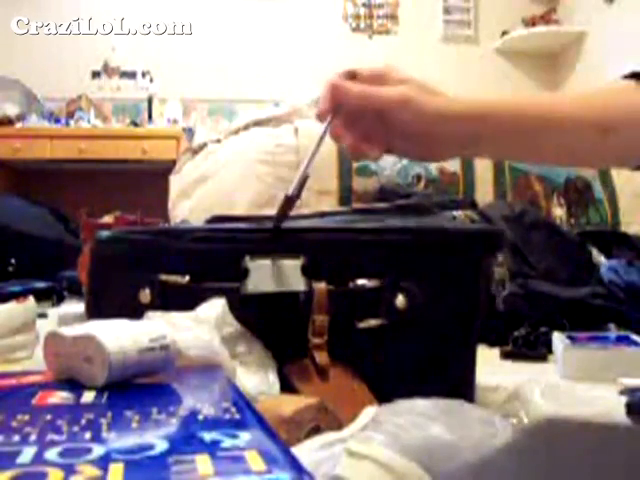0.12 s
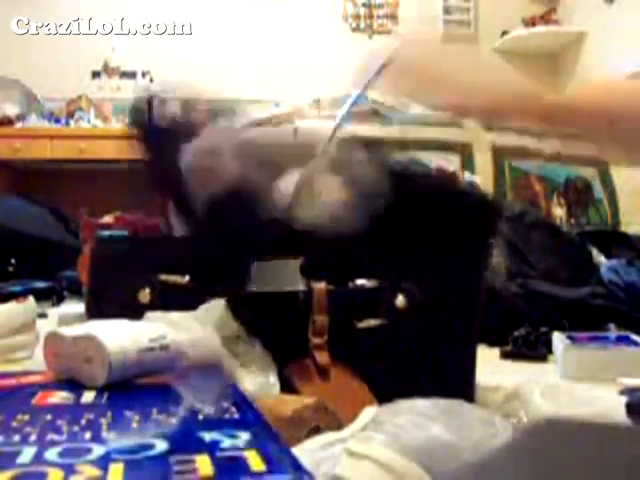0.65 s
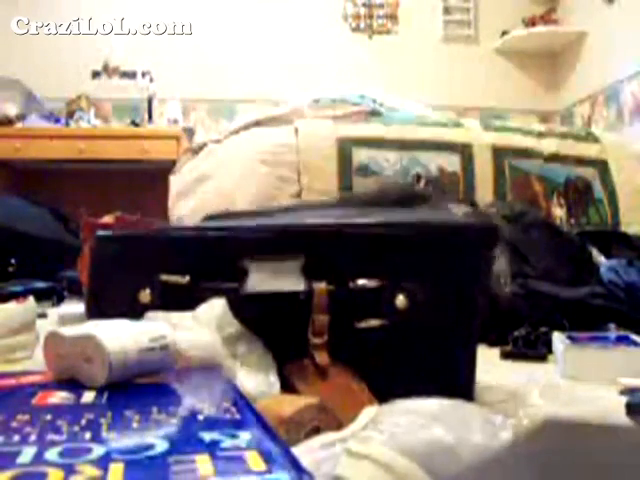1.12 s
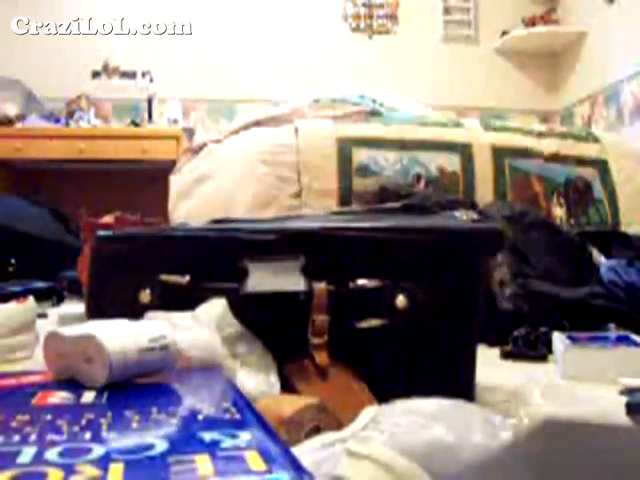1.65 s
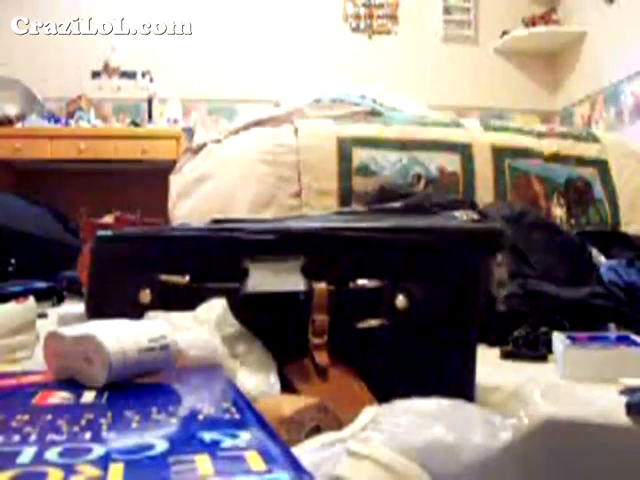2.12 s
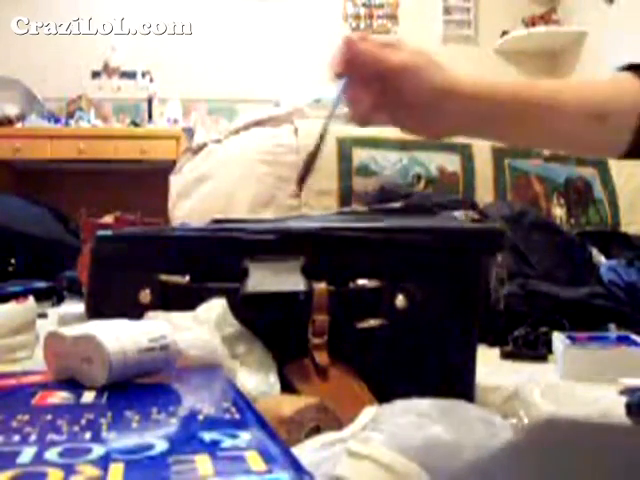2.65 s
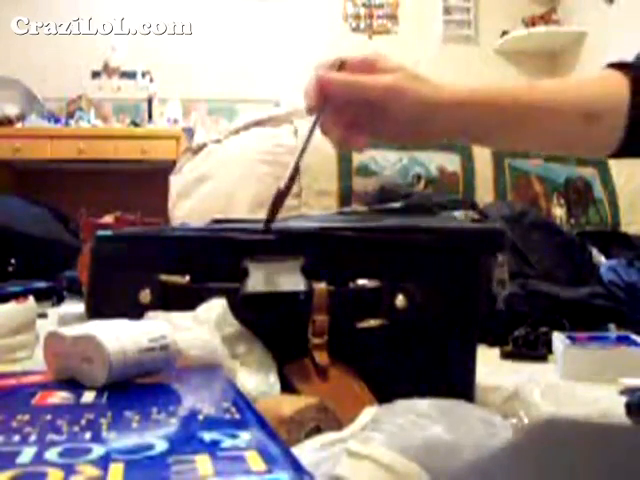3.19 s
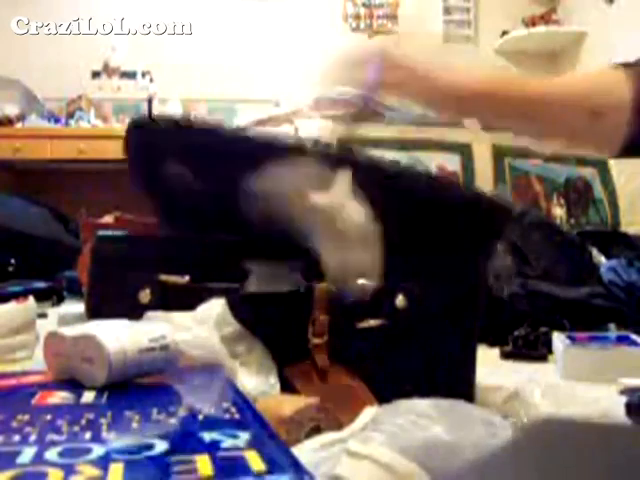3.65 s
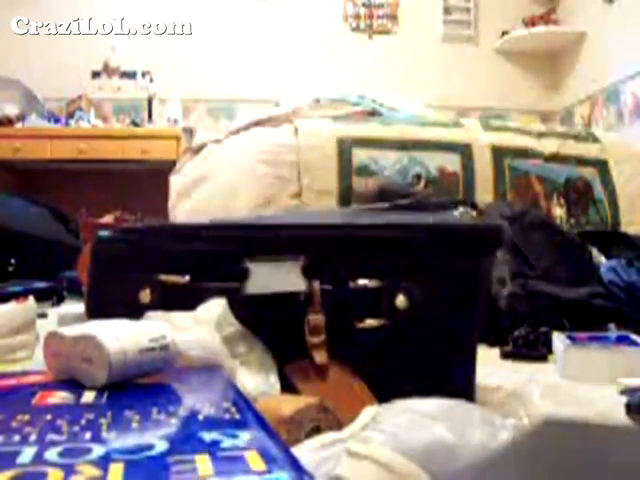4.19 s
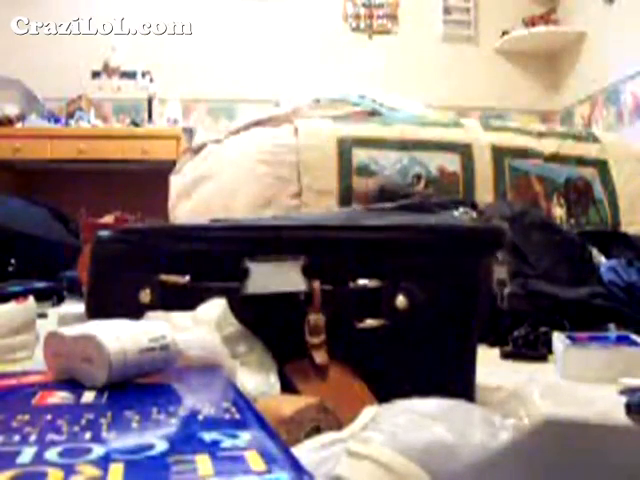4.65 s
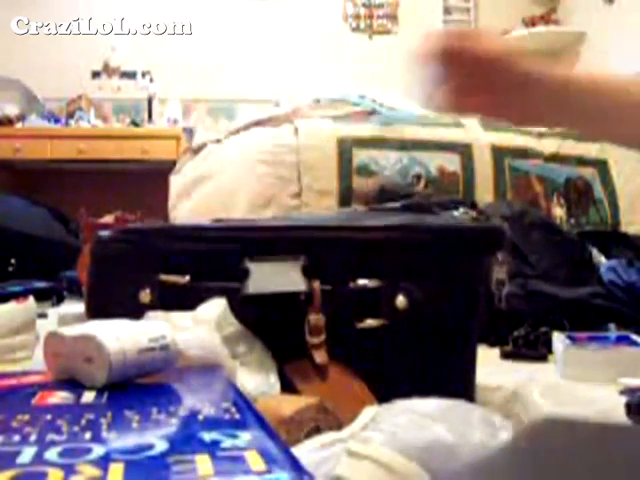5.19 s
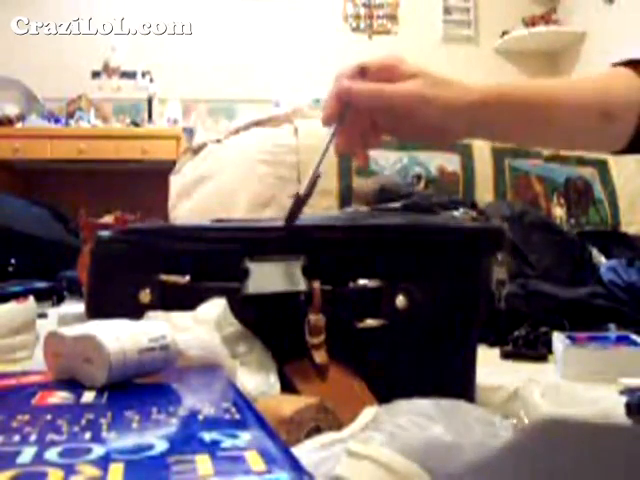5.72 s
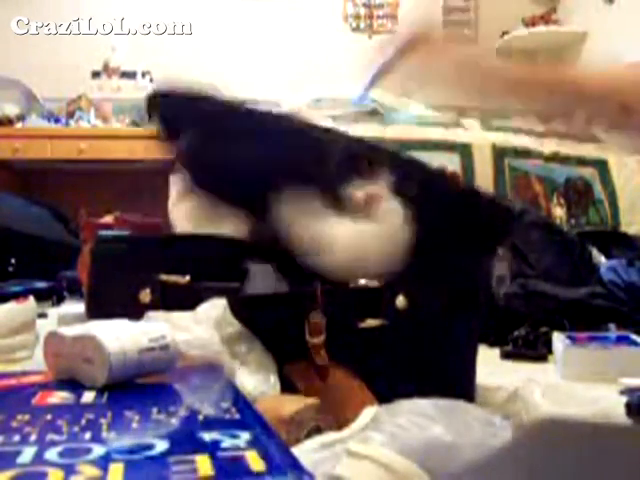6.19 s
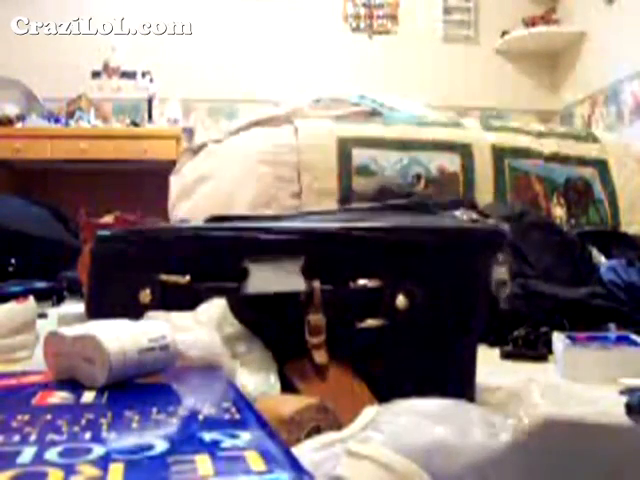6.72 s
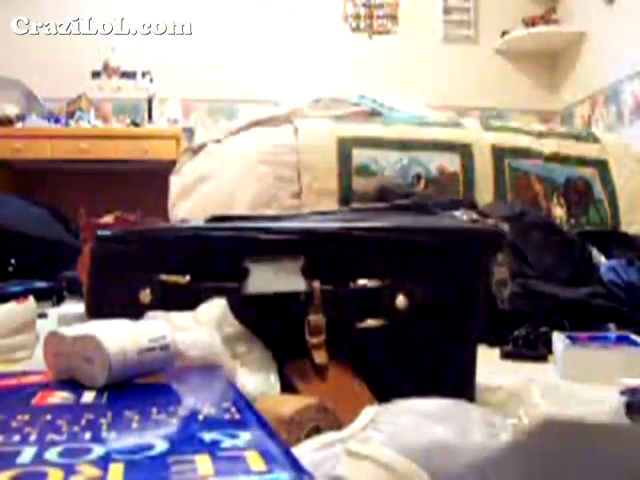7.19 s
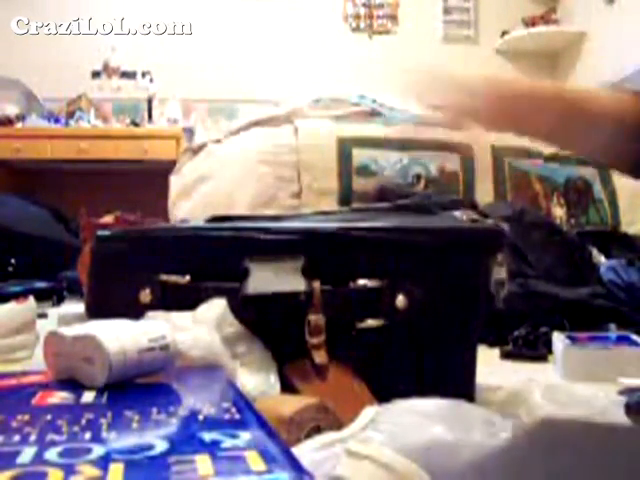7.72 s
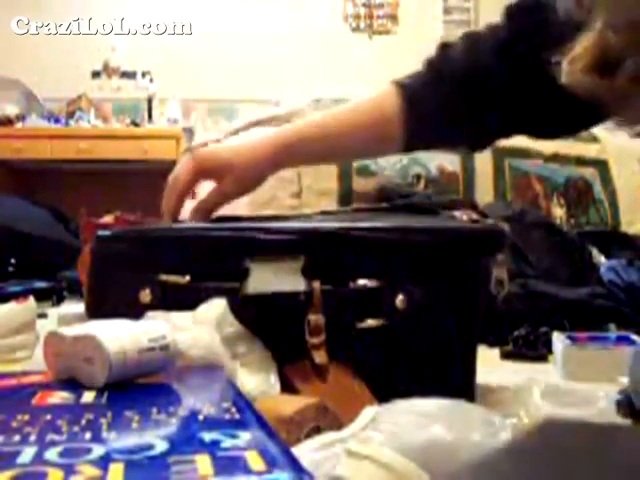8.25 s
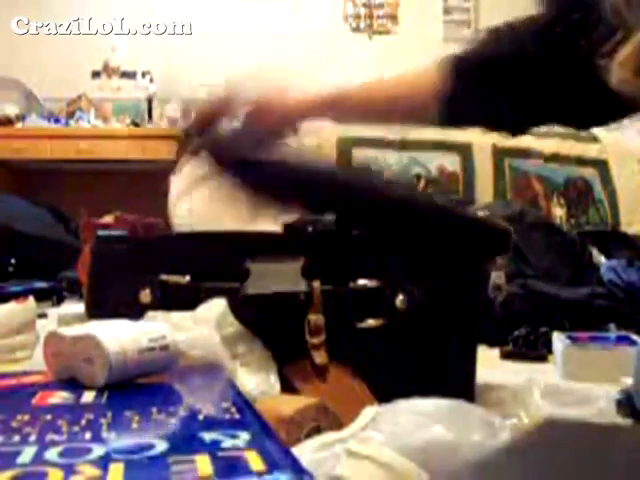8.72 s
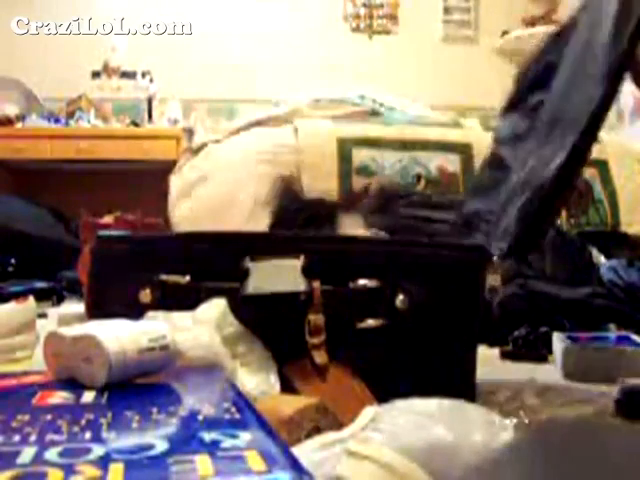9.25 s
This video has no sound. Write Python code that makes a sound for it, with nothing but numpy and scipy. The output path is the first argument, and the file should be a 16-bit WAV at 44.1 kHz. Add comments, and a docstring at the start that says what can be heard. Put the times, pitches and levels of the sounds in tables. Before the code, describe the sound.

A cheap, muffled microphone sits near a hard case in a small soft room. Throughout runs camera noise: a low thump about fifteen times a second, with irregular extra thumps, gritty buzz, faint trembling whine and hiss. After a small tick near 0.5 s, a cat bursts up at 0.65-0.8 s with clustered hollow bangs, bright claw snaps and rattling; the lid slams heavily at 1.2 s, followed by lighter bumps and scuffing to 1.6 s. A faint tap comes at 2.85 s. A light bump at 3.45 s leads to the hardest, clipped bang at 3.68 s, then scrabbling and a lid drop at 4.1-4.2 s. Very faint contact follows at 5.5 s. The third burst knocks at 6.05-6.25 s and slams at 6.67 s. After near stillness, soft lid-lifting clicks and drags come at 8.65 s, then dull bumps at 9.1-9.35 s.

```python
"""A cat bursts out from under the lid of a hard case and drops back, three times; a hand taps and lifts the lid.
Blows ring the case modes, hard tips snap, and swelling noise makes the thud, lid rattle and drag of each move.
A small camera adds its own electronics: a low thump per picture, a few more, unevenly spaced, per stored block,
buzz riding on the current, faint whine and hiss. Its microphone is dull above 4.9 kHz and clips on the hardest blow."""
import sys
import numpy as np
from scipy import signal
from scipy.fft import rfft, irfft, next_fast_len
from scipy.io import wavfile
from scipy.ndimage import uniform_filter1d, map_coordinates

SR = 44100
rng = np.random.default_rng(int(sys.argv[2]) if len(sys.argv) > 2 else 0)


def boost_factor(decibels):
    """Convert a level in decibels to a linear amplitude factor."""
    exponent = np.asarray(decibels, float) / 20
    return 10 ** exponent


def wav_out(sig):
    """Save sig, one row per channel (or a flat mono array), as 16-bit PCM at SR to the path in sys.argv[1]."""
    wavfile.write(sys.argv[1], SR, np.round(np.clip(np.atleast_2d(sig).T, -1, 1) * 32767).astype(np.int16))


N = 413216


def unit(x):
    """Scaled to rms 1."""
    return x / np.sqrt(np.mean(x ** 2) + 1e-20)


def filtered(x, response):
    """x times a complex response of frequency, with zero padding against wrap-around."""
    size = next_fast_len(len(x) + SR // 5)
    f = np.fft.rfftfreq(size, 1 / SR) + 1e-3  # keeps log(f) finite
    return irfft(rfft(x, size) * response(f), size)[:len(x)]


def coloured(x, points):
    """x shaped, zero phase, by (frequency [Hz], level [dB]) points on a log axis."""
    hz, db = np.transpose(points)
    return filtered(x, lambda f: boost_factor(np.interp(np.log(f), np.log(hz), db, left=-120, right=-120)))


def resonances(modes):
    """Causal response of (frequency [Hz], width [Hz], level [dB]) modes, summed with alternating signs."""
    def response(f):
        total = 0
        for k, (hz, width_hz, db) in enumerate(modes):
            total = total + (-1) ** k * boost_factor(db) * 1j * f * width_hz / (hz * hz - f * f + 1j * f * width_hz)
        return total
    return response


def region(hz, spread):
    """Case modes, strongest near hz, fading by spread dB times octaves squared; soft contact dulls the top."""
    # case modes: (frequency [Hz], width [Hz], level before the fade [dB])
    case = [(133, 31.6, 5), (194.6, 20.2, 4), (222.1, 24, 0), (267.5, 27.4, 1), (393, 47, -0.5),
            (515, 107, -3.5), (690, 143, -5.5), (960, 203, -7.5)]
    soft_hz = 1300  # paws and a padded lid excite little above this
    modes = resonances([(c, w, db - spread * np.log2(c / hz) ** 2) for c, w, db in case])
    return lambda f: modes(f) / (1 - (f / soft_hz) ** 2 + 1.4j * f / soft_hz)


def grains(smooth_s, lumpy_db):
    """Noise of rms 1 whose dB level runs between random values smooth_s apart."""
    jumps = map_coordinates(rng.standard_normal(N // 40), [np.arange(N) / (smooth_s * SR)], order=1)
    return unit(rng.standard_normal(N) * boost_factor(lumpy_db * jumps))


def current(starts_s, length_s):
    """Count of loads drawing current; the array begins half a second early."""
    steps = np.zeros(N + SR)
    at = np.round(np.asarray(starts_s) * SR).astype(int) + SR // 2
    np.add.at(steps, at, 1)
    np.add.at(steps, at + round(length_s * SR), -1)
    return np.cumsum(steps)


def sag(starts_s, db, length_s, coupling_hz, smooth_hz, q):
    """A load pulls the supply down; two coupling capacitors make it rebound."""
    coupling = lambda f: (1j * f / (coupling_hz + 1j * f)) ** 2
    smoothing = lambda f: 1 / (1 - (f / smooth_hz) ** 2 + 1j * f / smooth_hz / q)
    dip = filtered(-boost_factor(db) * current(starts_s, length_s), lambda f: coupling(f) * smoothing(f))
    return dip[SR // 2:][:N]


def stores(pictures_s):
    """Thump times of stored blocks: every third picture starts two or three audible, unevenly spaced writes."""
    blocks_s = pictures_s[::3, None]
    # delay from the block's picture to the first write, then the two gaps between writes
    least_s, most_s = np.array([.1, .013, .013]), np.array([.114, .034, .034])
    hidden_share = .12  # blocks whose third thump is not heard apart from the picture thump
    delays_s = least_s + (most_s - least_s) * rng.random((len(blocks_s), len(least_s)))
    starts_s = blocks_s + np.cumsum(delays_s, axis=1)
    third_heard = rng.random(len(blocks_s)) > hidden_share
    return np.concatenate([starts_s[:, :-1].ravel(), starts_s[third_heard, -1]])


def hiss():
    """Steady noise with a falling spectrum."""
    # spectrum: (frequency [Hz], relative density [dB per Hz])
    spectrum = [(12, -10.5), (30, -3), (90, -7), (150, -11), (245, -19), (330, -23.5), (800, -28.5),
                (1700, -36.5), (2500, -37.5), (3100, -35), (4200, -48.5), (5000, -61.5), (5600, -92)]
    level_db = -34.5  # rms
    return boost_factor(level_db) * unit(coloured(rng.standard_normal(N), spectrum))


def whine():
    """Steady tones whose pitch and level tremble quickly."""
    partials = [(387.6, 4, -48), (775.2, 12, -56), (1190, 16, -63), (2374, 14, -55), (None, 38, -59)]
    # creep of the top tone: (time [s], frequency [Hz])
    creep = [(0.0, 3004), (0.49, 3074), (4.36, 3010), (4.93, 3064), (8.191, 3110), (9.37, 3090)]
    drift_hz = np.interp(np.arange(N) / SR, *np.transpose(creep))
    tones = 0
    for hz, wander_hz, db in partials:
        tremble, flutter = [unit(uniform_filter1d(row, size=500)) for row in rng.standard_normal((2, N))]
        pitch_hz = (hz or drift_hz) + wander_hz * tremble
        level = boost_factor(db + 2.5 + 2.5 * flutter)
        tones = tones + level * np.sin(2 * np.pi * np.cumsum(pitch_hz) / SR)
    return tones


def camera():
    """Supply thumps, the buzz gated by the load current, whine and hiss."""
    # picture clock: (first [s], period [s])
    clock = (-.001, .066647)
    # supply dips: (drive before filters [dB], length [s], coupling [Hz], smoothing [Hz], Q [-])
    picture_sag = (-14, .0066, 9.5, 94, 1)
    store_sag = (-10, .0058, 20, 80.5, 0.38)
    # leaks while current flows: (frequency [Hz], width [Hz], relative level [dB])
    buzz_modes = [(690, 280, 7.5), (1400, 330, 3), (2175, 280, 5), (3586, 290, -2), (4070, 310, -9)]
    first_s, period_s = clock
    pictures_s = first_s + period_s * np.arange(int(N / SR / period_s) + 1)
    writes_s = stores(pictures_s)
    thumps = sag(pictures_s, *picture_sag) + sag(writes_s, *store_sag)
    load = boost_factor(-2) * current(pictures_s, 0.0082) + current(writes_s + 0.0017, .006)
    load = uniform_filter1d(load[SR // 2:][:N], size=60)
    buzz = boost_factor(-42.5) * load * unit(filtered(rng.standard_normal(N), resonances(buzz_modes)))
    return thumps + buzz + whine() + hiss()


def bedroom(x):
    """A small soft room answers briefly: a decaying noise tail of unit energy."""
    t60_s, gap_s = 0.26, .004
    t = np.arange(SR // 4) / SR
    tail = rng.standard_normal(len(t)) * boost_factor(-60 * t / t60_s) * (t > gap_s)
    return signal.fftconvolve(x, tail / np.linalg.norm(tail))[:N]


def ticks():
    """A hard tip meets the shell: a bright snap with one broad peak, and a jolt of the lid's high modes."""
    # claws and catches: (time [s], snap peak [dB], broad peak [Hz], lid against snap [dB])
    contacts = [(0.522, -22, 2380, -14), (0.6716, -24, 2460, -6), (0.7038, -19, 3200, -4),
                (0.7183, -13, 2870, -9), (0.7699, -11.5, 2460, -14), (0.7779, -14, 3030, -10.5),
                (0.8639, -24.5, 2650, -10), (0.992, -26, 2450, -10), (1.1952, -19, 2560, -11),
                (1.2019, -19, 2260, -8), (1.3014, -20, 2590, -2), (1.5928, -36.5, 2360, 2),
                (3.456, -30, 2370, -10), (3.671, -13, 2540, -2), (3.677, -13, 2720, -1),
                (3.6837, -10, 2130, -3), (3.7626, -19, 2080, -9), (3.7755, -15, 2560, -10),
                (3.8187, -17.5, 2440, -17), (3.8404, -18, 2090, -14), (4.0395, -30, 2140, -1),
                (4.1718, -14.5, 2430, -9), (4.2025, -10.5, 1900, -19), (4.229, -20, 1950, -5),
                (4.9985, -43, 2370, -8), (5.5119, -43, 2380, -13), (6.0337, -31.5, 3190, -7),
                (6.068, -34, 2380, -8), (6.1331, -28, 2290, -4), (6.1734, -14, 2120, -14),
                (6.229, -23, 2410, -4), (6.2509, -19, 2400, -5), (6.471, -30.5, 2380, -8),
                (6.6648, -23.5, 2410, -8), (6.6715, -14.5, 2070, -10), (6.793, -31, 2970, -8),
                (8.6647, -31, 2330, -2), (8.7291, -39, 2190, -8), (9.1292, -24.5, 2010, -10)]
    # hard contact spectrum: (frequency [Hz], relative density [dB per Hz])
    snap = [(600, -31.5), (1100, -7), (2500, -1.5), (3800, 0), (4600, -12.5), (5200, -25.5)]
    t60_s, width_hz = 0.012, 600
    out, t, lead = np.zeros(N + SR), np.arange(SR // 10) / SR, SR // 200
    click = 1. * (t == 0)
    lid = filtered(np.pad(click, (lead, 0)), region(620, spread=10.0))
    lid = lid / np.abs(lid).max()
    for s, db, hz, lid_db in contacts:
        burst = rng.standard_normal(len(t)) * boost_factor(-60 * t / t60_s) + 3 * click
        peak = resonances([(hz, width_hz, 0)])
        # lead leaves room for the zero-phase pre-ring
        burst = filtered(np.pad(burst, (lead, 0)), lambda f: 0.14 + peak(f))
        burst = coloured(burst, snap)
        both = burst / np.abs(burst).max() + boost_factor(lid_db) * lid
        out[round(s * SR) - lead:][:len(burst)] += boost_factor(db) * both
    return out[:N]


def knocks():
    """Each blow swings the panel once or twice; the impact and a short chatter ring the modes near it."""
    # blows: (time [s], peak [dB], struck region [Hz])
    blows = [(.62, -19, 250), (.67, -12.5, 207), (.686, -6.5, 232), (.703, -15.5, 280), (.722, -8.5, 187),
             (0.796, -19, 300), (1.077, -18.5, 503), (1.196, -13, 498), (1.2047, -3.5, 176),
             (1.213, -9, 398), (1.23, -8.5, 180), (1.298, -16, 400), (1.376, -16.5, 372), (1.455, -18, 274),
             (1.542, -23, 195), (1.59, -22.5, 425), (2.846, -26, 210), (3.456, -27, 196), (3.647, -15, 476),
             (3.668, -12.5, 264), (3.677, 4, 212), (3.696, -9, 177), (3.7031, -7.5, 200), (3.716, -10, 205),
             (3.727, -10.5, 200), (4.065, -18.5, 191), (4.095, -10.5, 333), (4.109, -15.5, 304),
             (4.169, -16, 180), (4.197, -17.5, 180), (4.204, -9, 190), (4.212, -12.5, 192),
             (5.507, -28, 207), (6.039, -22, 194), (6.135, -14, 202), (6.183, -7.5, 185),
             (6.205, -14.5, 221), (6.25, -19.5, 265), (6.473, -24.5, 600), (6.496, -26, 790),
             (6.515, -25, 760), (6.543, -17.5, 517), (6.636, -17.5, 400), (6.654, -12.5, 178),
             (6.663, -15, 388), (6.6716, -4, 250), (6.699, -20, 221), (6.812, -24, 740),
             (7.612, -23.5, 241), (8.53, -31.5, 450), (9.087, -27.5, 571), (9.297, -18, 470),
             (9.329, -24.5, 300)]
    push_db, push_db_per_db, push_q = 3.5, 0.98, 2.45  # swing against the modes; grows with the blow
    push_top = 3.2  # soft top over the swing's pitch
    out, t = np.zeros(N + SR), np.arange(SR // 4) / SR
    click = 1. * (t == 0)
    for s, db, hz in blows:
        t60_s = max(0.045 + 0.05 * db, .005)  # only the hardest blow chatters longer than 5 ms
        chatter = .03 * rng.standard_normal(len(t)) * boost_factor(-60 * t / t60_s)
        swing = resonances([(hz, hz / push_q, push_db + push_db_per_db * db)])
        push = filtered(click, lambda f: swing(f) / (1 + 1j * f / (push_top * hz)) ** 2)
        ring = filtered(chatter + click, region(hz, spread=14)) + push
        out[round(s * SR):][:len(t)] += boost_factor(db) * ring / np.abs(ring).max()
    return out[:N]


def swell(s, rise_s, t60_s, db):
    """A gain that climbs 17.5 dB over rise_s to db at s and dies away."""
    t = np.arange(N, dtype=np.float32) / SR - s
    return boost_factor(db + np.where(t < 0, 17.5 * t / rise_s, -60 * t / t60_s))


def scuffle():
    """The cat's weight thuds in the low modes, the lid rattles in the high ones, fur and claws drag on the lining."""
    # lunges, slides, settlings: (hardest moment [s], rise [s], weight t60 [s], weight [dB rms], drag [dB rms])
    moves = [(.64, 0.044, .3, -31, -41), (.69, 0.028, 0.75, -22.5, -31), (0.789, 0.061, 0.24, -24, -31),
             (.93, .05, 0.48, -34.5, -50), (.99, 0.054, 0.31, -33, -38), (1.08, 0.0092, 0.42, -35, -45.5),
             (1.2, 0.019, 0.33, -16, -28.5), (1.31, .02, 0.44, -27.5, -37), (1.385, 0.04, 0.1, -30, -37),
             (1.55, 0.18, 0.24, -31, -46.5), (1.87, 0.39, 0.35, -53, -48.5),
             (3.451, 0.093, 0.46, -32.5, -50.5), (3.641, 0.051, .1, -24.5, -44.5),
             (3.679, 0.039, 0.99, -25, -28.5), (3.77, .05, 0.35, -24, -33), (3.845, .02, .15, -35, -36),
             (3.95, 0.065, .3, -37, -38.5), (4.098, 0.038, 0.43, -25.5, -38),
             (4.21, 0.12, 0.26, -28.5, -35), (6.042, .02, .3, -34, -50), (6.14, 0.052, .4, -27.5, -38),
             (6.18, 0.028, 0.33, -25.5, -32), (6.26, 0.045, 0.62, -32, -38), (6.5, 0.081, 0.43, -38, -43.5),
             (6.56, 0.036, 0.18, -29, -46), (6.673, 0.057, .35, -19.5, -33.5),
             (6.819, 0.092, 0.15, -37, -37.5), (6.915, 0.063, 0.36, -41, -49.5),
             (8.664, 0.042, 0.45, -38, -46.5), (8.96, .04, .3, -43, -57), (9.12, 0.086, 0.44, -41, -45),
             (9.31, 0.022, 0.56, -32, -45), (9.36, 0.038, 0.44, -30.5, -38.5)]
    # drag spectrum: (frequency [Hz], relative density [dB per Hz])
    fur_spectrum = [(900, -17.5), (1300, -7.5), (2100, 2), (2800, 0), (3800, -5.5), (4400, -12.5),
                    (5000, -32.5), (5600, -63)]
    drag_lingers = 1.4  # drag t60 over weight t60
    drag_share, rattle_db = 0.67, 1.5  # rattle follows a dB mix of drag and weight; level over that mix
    weight = np.array([swell(s, rise_s, t60_s, db) for s, rise_s, t60_s, db, _ in moves])
    drag = np.array([swell(s, rise_s, drag_lingers * t60_s, db) for s, rise_s, t60_s, _, db in moves])
    shake = boost_factor(rattle_db) * weight ** (1 - drag_share) * drag ** drag_share
    thud = unit(filtered(grains(.006, lumpy_db=1.5), region(200, spread=11)))
    rattle = unit(filtered(grains(.004, lumpy_db=2.5), region(720, spread=11)))
    fur = unit(coloured(grains(.002, lumpy_db=2.0), fur_spectrum))
    return weight.max(axis=0) * thud + shake.max(axis=0) * rattle + drag.max(axis=0) * fur


def scene():
    """Hits with their room tail, the scuffle, and the camera's own noise."""
    hits = knocks() + ticks()
    return (hits + boost_factor(-13) * bedroom(hits) + scuffle() + camera())[None]


def top_cut(x):
    """Nothing passes above the cut-off."""
    return signal.sosfilt(signal.butter(12, 15700, fs=SR, output="sos"), x)


def record(dry):
    """A steep top cut, clipping that sprays above it up to a second cut, a faint converter floor."""
    cut_hz, second_cut_hz = 4900, 9600
    top, knee = .95, 14  # clip level [full scale], sharpness
    cut = filtered(dry[0], lambda f: 1 / np.sqrt(1 + (f / cut_hz) ** 40))
    clipped = cut / (1 + np.abs(cut / top) ** knee) ** (1 / knee)
    clipped = filtered(clipped, lambda f: 1 / (1 + (f / second_cut_hz) ** 30))
    floor = boost_factor(-88) * rng.standard_normal(N)
    return top_cut((clipped + floor)[None])


dry = scene()
out = record(dry)
wav_out(out)
```